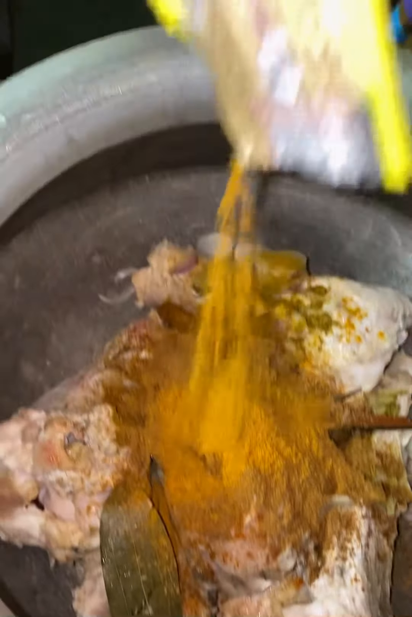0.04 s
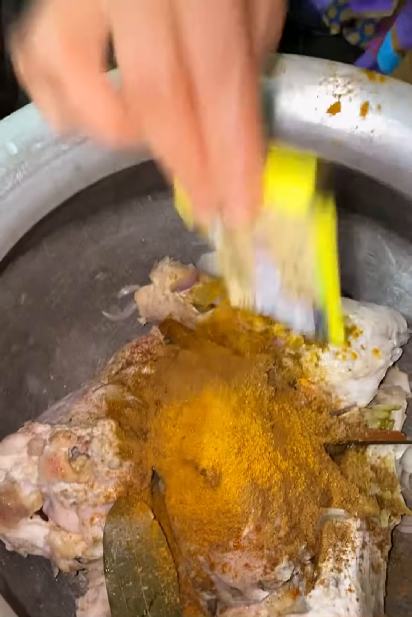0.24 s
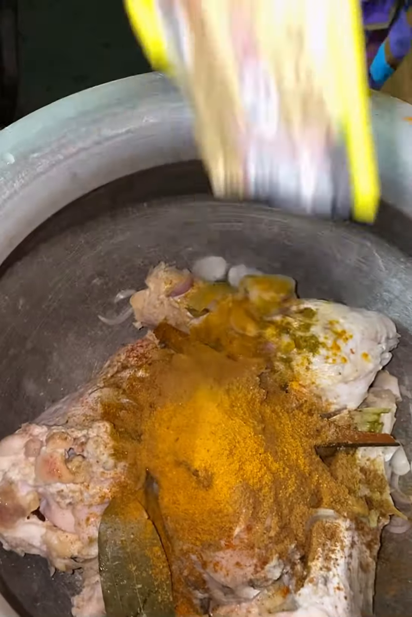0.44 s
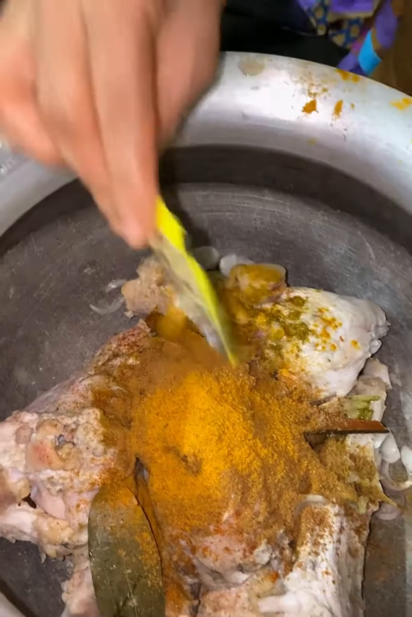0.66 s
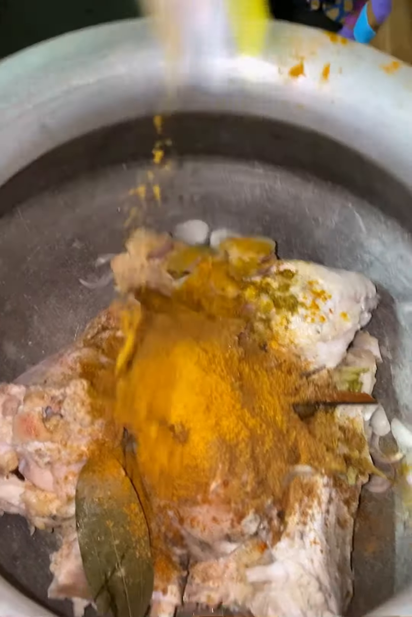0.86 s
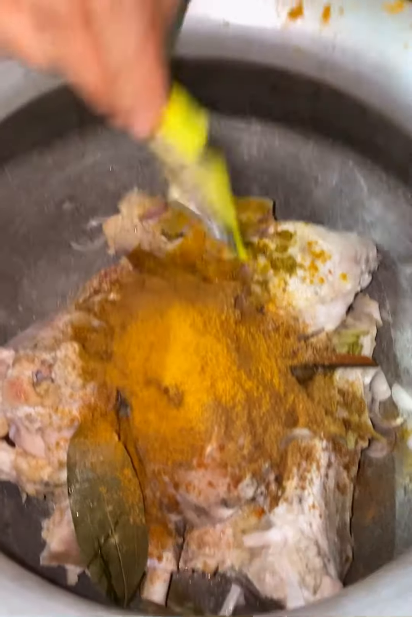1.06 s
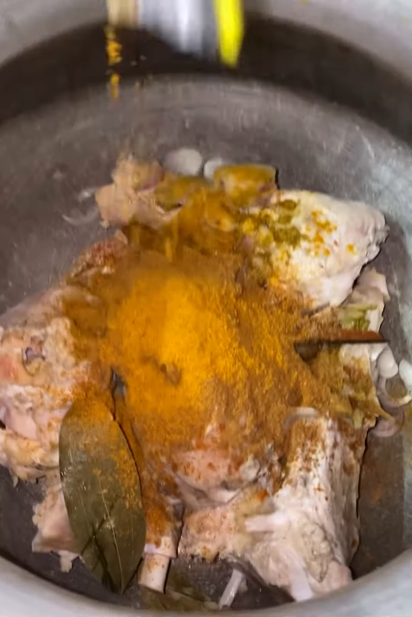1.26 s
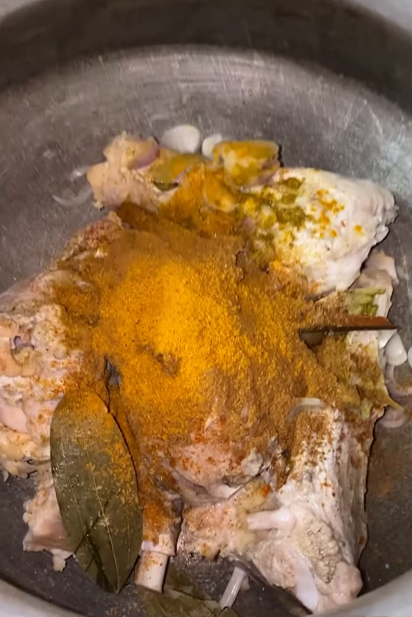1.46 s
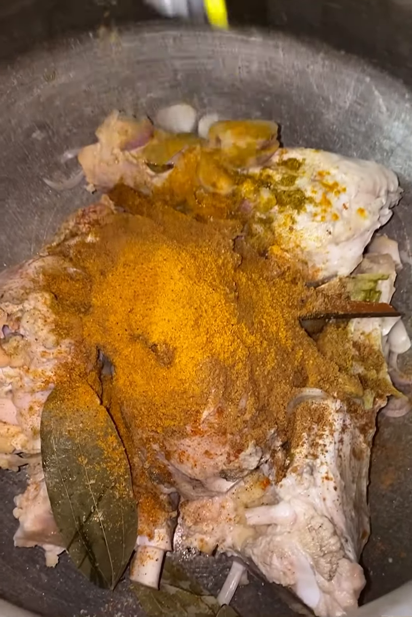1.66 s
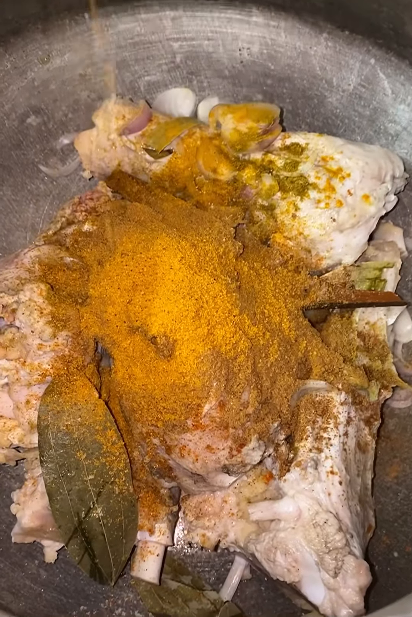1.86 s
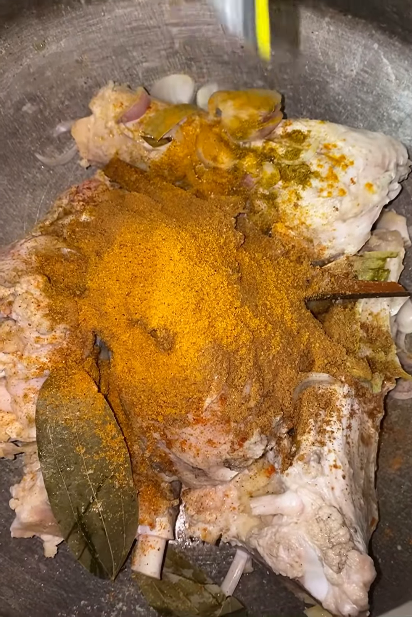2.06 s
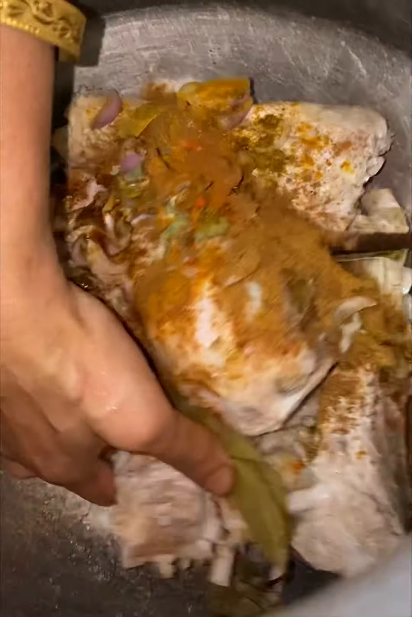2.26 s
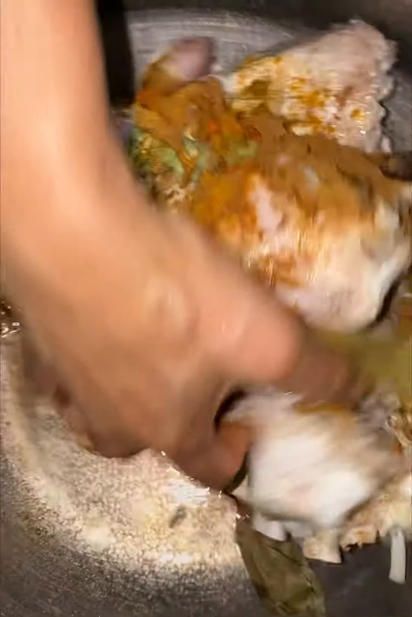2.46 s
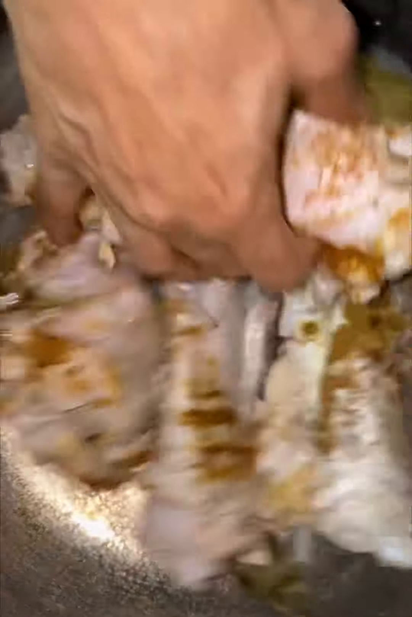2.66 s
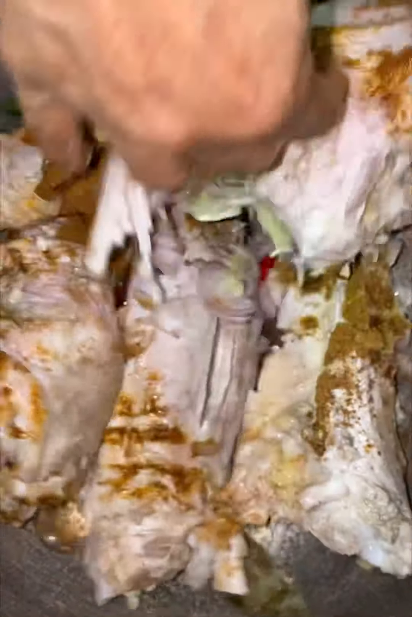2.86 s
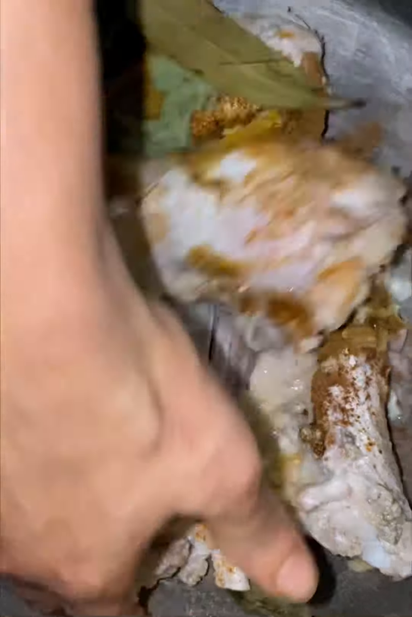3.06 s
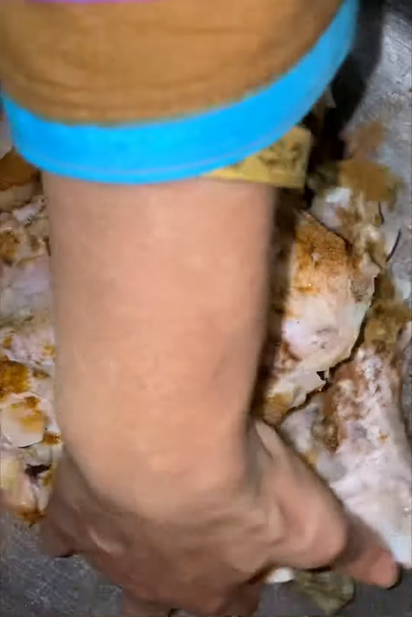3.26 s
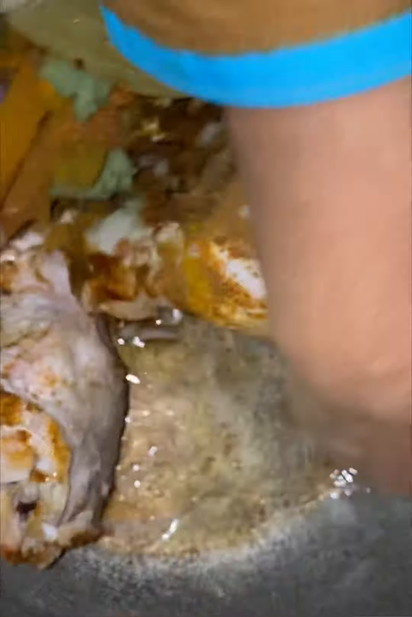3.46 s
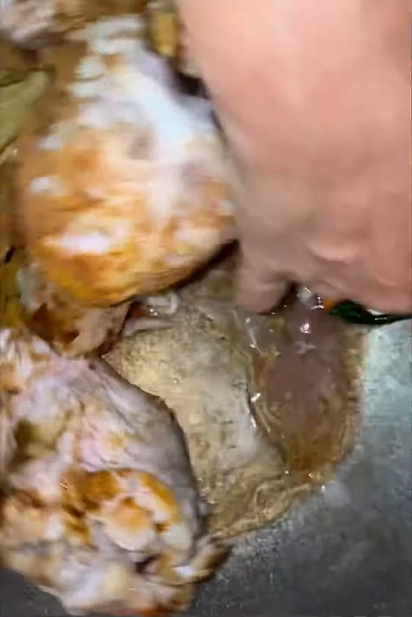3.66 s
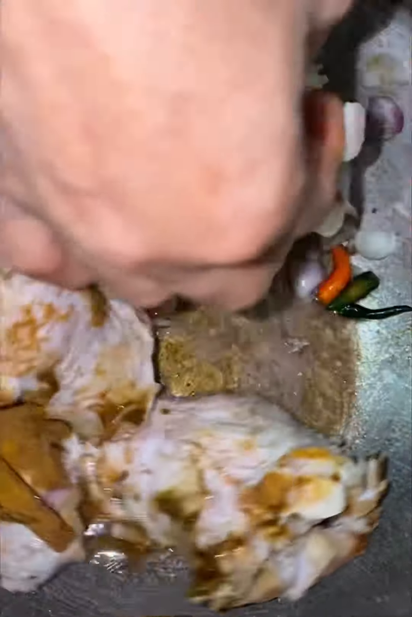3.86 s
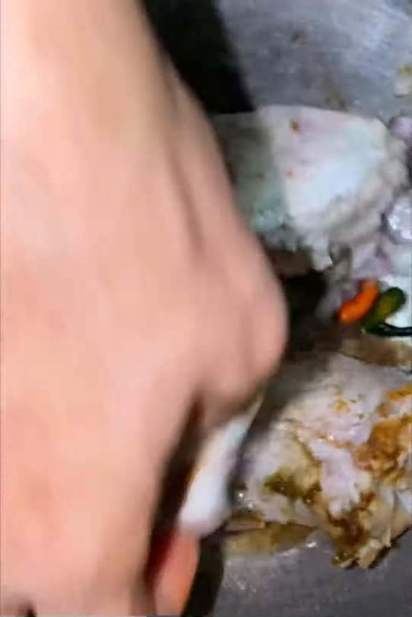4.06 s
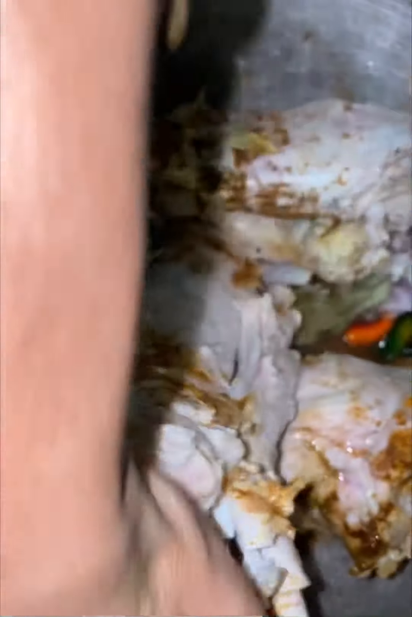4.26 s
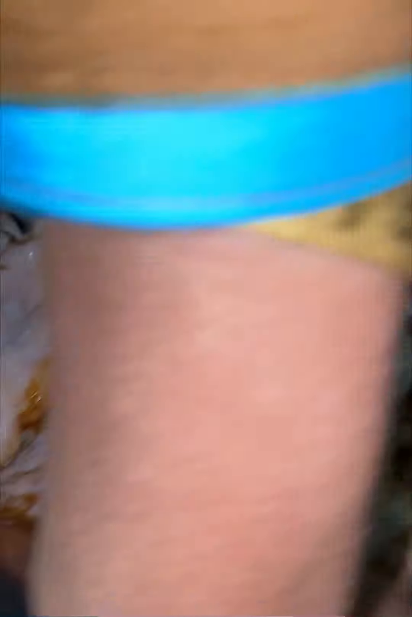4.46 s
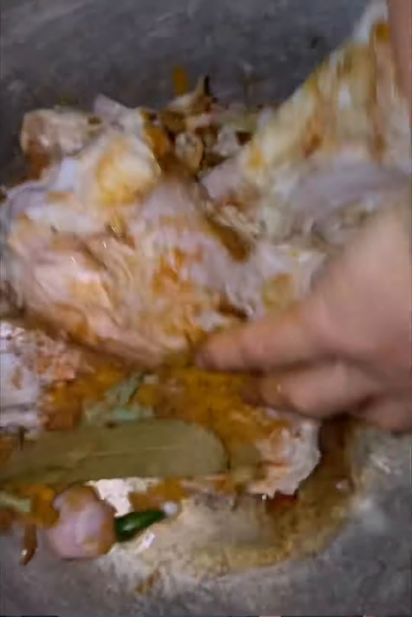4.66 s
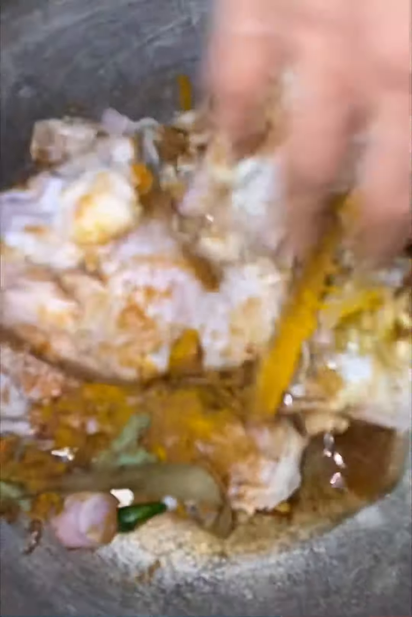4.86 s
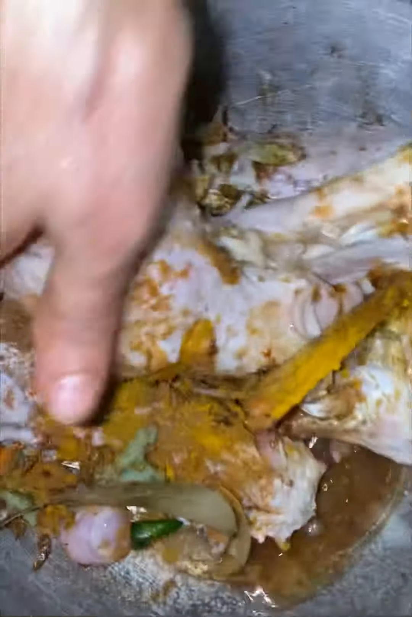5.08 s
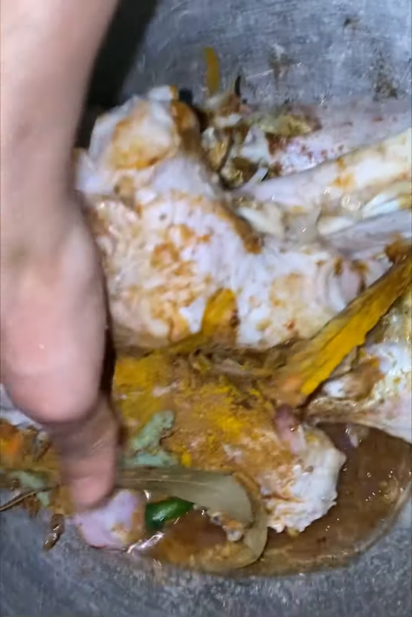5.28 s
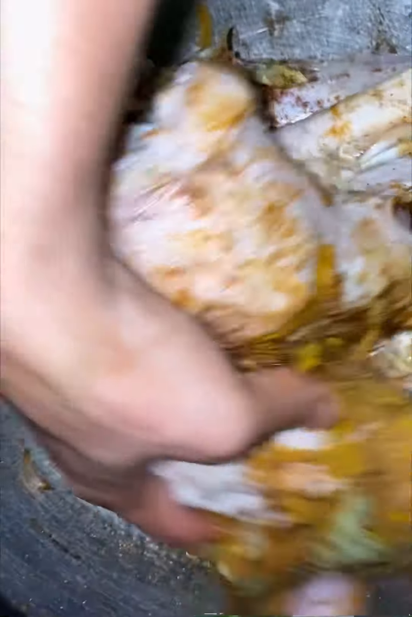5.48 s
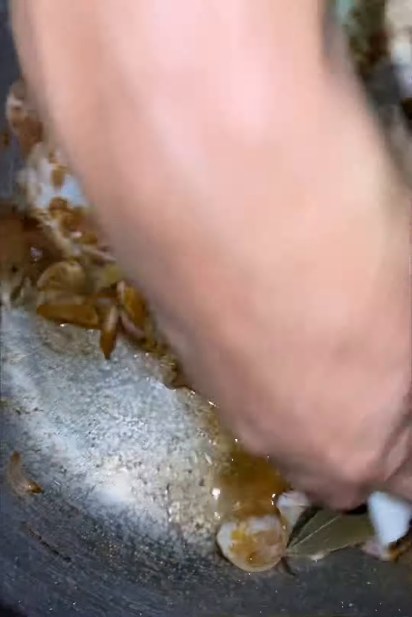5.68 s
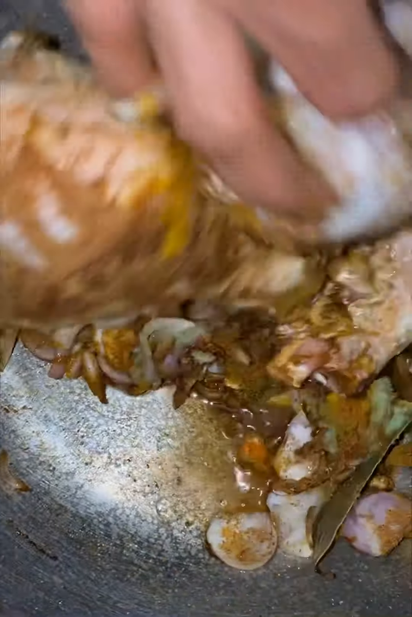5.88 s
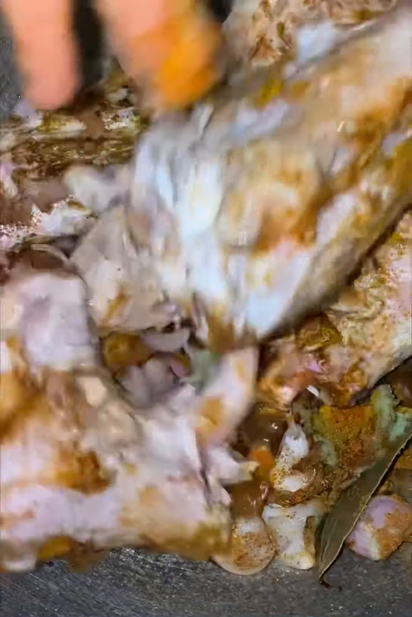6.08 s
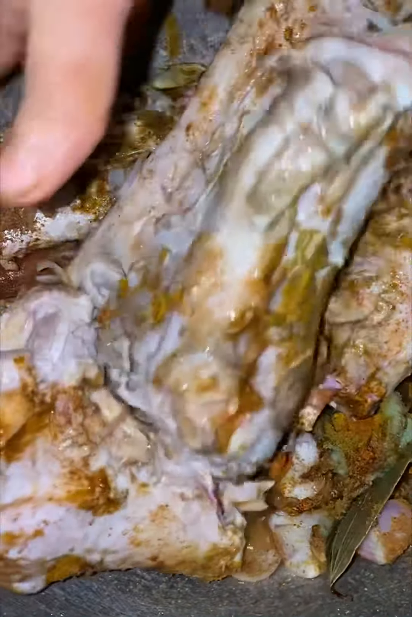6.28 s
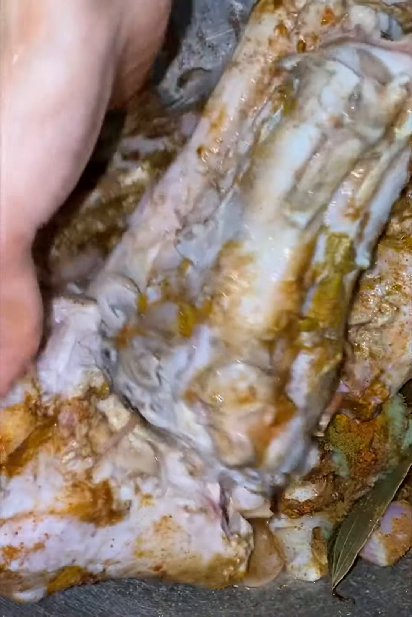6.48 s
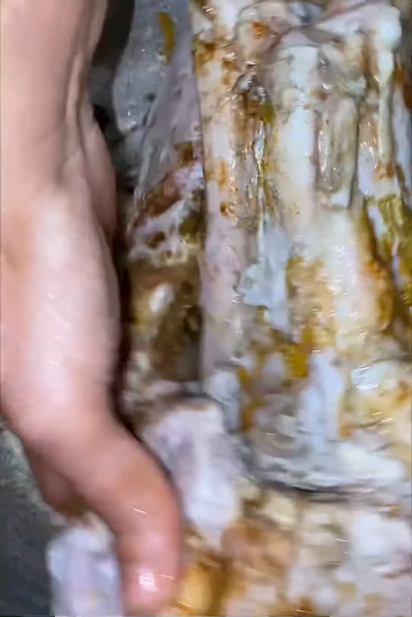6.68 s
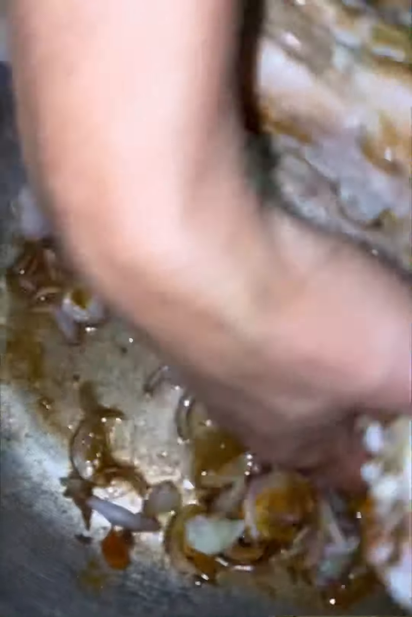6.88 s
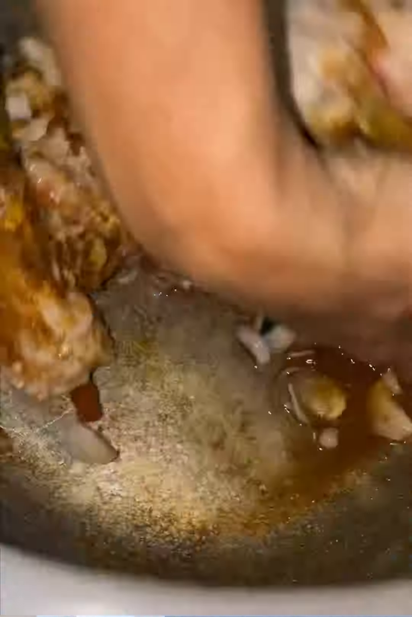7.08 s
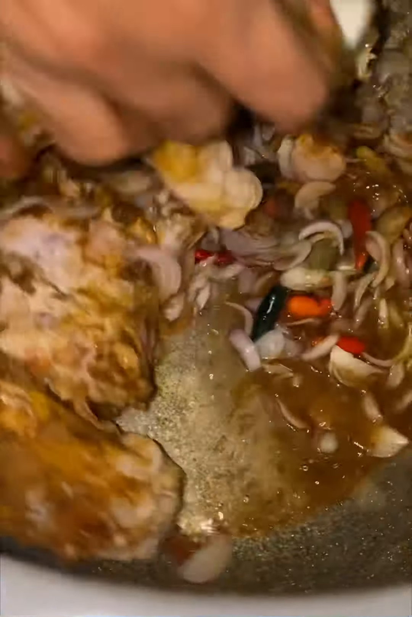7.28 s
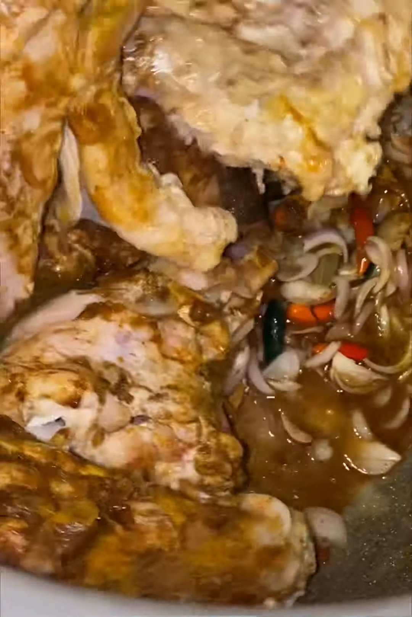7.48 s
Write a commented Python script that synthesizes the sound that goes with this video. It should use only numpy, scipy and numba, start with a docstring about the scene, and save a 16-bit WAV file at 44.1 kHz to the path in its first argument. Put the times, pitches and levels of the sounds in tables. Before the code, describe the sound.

A foil spice packet crackles, then raw meat thuds and squelches in a metal pot as bones knock and scrape, over a low hum.

```python
"""First a foil spice packet crackles as it is shaken over raw meat in a wide metal pot.
Then a hand turns the pieces over: meat thuds and rubs on the bottom, bones knock and drag on the wall,
and each touch makes the metal ring. Gritty marinade scrapes, and air pockets in it squelch and pop.
A kitchen motor hums behind it all, and the loudest blows overload the microphone."""
import sys
import numpy as np
from scipy import signal
from scipy.fft import rfft, irfft
from scipy.io import wavfile
from scipy.ndimage import uniform_filter1d
from numba import njit

SR = 44100
rng = np.random.default_rng(int(sys.argv[2]) if len(sys.argv) > 2 else 0)


def unload_audio(sound):
    """Save the sound as a 16-bit wav file, at the path given as the first command line argument."""
    columns = np.transpose(np.atleast_2d(sound))
    # keep every value between -1 and 1, then stretch to whole-number steps
    steps = np.round(np.clip(columns, -1, 1) * 32767)
    wavfile.write(sys.argv[1], SR, steps.astype(np.int16))


N = 332073
TIME_S = np.arange(N) / SR
HIT_SAMPLES = 8192  # room for one hit to die away
HAND_IN_S = 2.285  # from here on the meat is never quite still


def amp(db):
    """Turns decibels into a gain."""
    return 10 ** (np.asarray(db) / 20)


def unit(x):
    """Scales a sound to an average power of 1."""
    return x / np.sqrt(np.mean(x ** 2))


def curves(spans):
    """Joins the rows into smooth lines over time; the level is silent before and after them."""
    start_s, level_db, *others = np.concatenate(spans).T
    level = np.interp(TIME_S, start_s, level_db, left=-120, right=-120)
    return [level] + [np.interp(TIME_S, start_s, column) for column in others]


def colour(x, points):
    """Makes a noise darker or brighter along (pitch_hz, gain_db) points."""
    hz, db = np.transpose(points)
    log_hz = np.log(np.maximum(np.fft.rfftfreq(N, 1 / SR), 1))
    return irfft(rfft(x) * amp(np.interp(log_hz, np.log(hz), db)), N)


def band(x, low_hz, high_hz, order=2):
    """Keeps the part of a sound between two pitches."""
    edges_hz = [low_hz, min(high_hz, .45 * SR)]
    return signal.sosfilt(signal.butter(order, edges_hz, "bandpass", fs=SR, output="sos"), x)


@njit
def resonate(x, hz, width_hz):
    """Makes a sound ring at a pitch that can move; a smaller width rings longer."""
    out, band_state, low_state = np.empty(len(x)), 0., 0.
    for i in range(len(x)):
        step, damping = np.tan(np.pi * hz[i] / SR), width_hz / hz[i]
        swing = (band_state + step * (x[i] + 1e-18 - low_state)) / (1 + step * (step + damping))
        band_state = 2 * swing - band_state
        low_state += 2 * step * swing
        out[i] = damping * swing
    return out


def wander(rate_hz):
    """Glides between random values, mostly within -1 to 1, rate_hz times a second."""
    hold = int(SR / rate_hz)
    steps = np.repeat(rng.standard_normal(N // hold + 1), hold)
    return 0.83 * uniform_filter1d(steps, hold)[:N]


def grains(per_s, spread_db, tail_s):
    """Tiny random slips, each a sudden puff of noise; a few are much louder than the rest."""
    slips = (rng.random(N) < per_s / SR) * amp(spread_db * rng.exponential(size=N))
    puffs = signal.lfilter([1], [1, -np.exp(-1 / (tail_s * SR))], slips)
    return unit(puffs * rng.standard_normal(N))


def patchy(x, spread_db, rate_hz):
    """Lets each part of the treble swell on its own, as the place of contact moves."""
    centres_hz = 1500 * 1.38 ** np.arange(8)
    return sum((-1) ** k * amp(spread_db * wander(rate_hz)) * resonate(x, np.full(N, hz), hz / 2)
               for k, hz in enumerate(centres_hz))


def snaps(start_s, level_db, pitch_hz, decay_s, spread):
    """Short bursts of noise, each strongest near its pitch; decay_s is the time to fall 60 dB."""
    out, t = np.zeros(N + HIT_SAMPLES), TIME_S[:HIT_SAMPLES]
    for at, gain, hz, decay in np.broadcast(start_s, amp(level_db), pitch_hz, decay_s):
        noise = rng.standard_normal(HIT_SAMPLES)
        burst = unit(band(noise, hz / spread, hz * spread, order=1)) + 0.07 * band(noise, hz / 5, 11000)
        fade = amp(-60 * t / max(decay, .005))
        out[int(at * SR):][:HIT_SAMPLES] += gain * burst * fade / 2
    return out[:N]


def rings(start_s, level_db, pitch_hz, decay_s, rise_s, sag_octaves_per_s):
    """Struck notes that fall 60 dB in decay_s; soft things push more slowly, and the pitch may sag."""
    out, t = np.zeros(N + HIT_SAMPLES), TIME_S[:HIT_SAMPLES]
    push = np.sin(np.pi / 2 * np.minimum(t / rise_s, 1)) ** 2
    slowed_s = np.cumsum(2 ** (-sag_octaves_per_s * t)) / SR
    for at, gain, hz, decay in np.broadcast(start_s, amp(level_db), pitch_hz, decay_s):
        fade = amp(-60 * np.maximum(t - rise_s, 0) / max(decay, .01))
        out[int(at * SR):][:HIT_SAMPLES] += gain * push * fade * np.sin(2 * np.pi * hz * slowed_s)
    return out[:N]


def rub(hz, width_hz, rough=1.0):
    """A note kept going by rubbing; with rough below 1, the steady push evens out its swells."""
    hz = hz * np.ones(N)
    note = resonate(resonate(rng.standard_normal(N), hz, width_hz), hz, width_hz)
    swell = np.sqrt(uniform_filter1d(note ** 2, int(SR / width_hz / 2)) + 1e-12)
    return unit(note / swell ** (1 - rough))


def strokes(rows, bend, rest_db):
    """Level in dB of movements that swell, hold and fade; extra columns lean to the loudest one."""
    t = np.arange(0, N + 16, 16) / SR
    peak_s, level_db, swell_s, hold_s, fade_s, *extras = np.transpose(rows)[:, :, None]
    rising = 1 + (t - peak_s) / swell_s
    falling = 1 - (t - peak_s - hold_s) / fade_s
    power = (amp(level_db) * np.clip(np.minimum(rising, falling), 0, 1) ** bend) ** 2
    creep = amp(2 * rest_db) * (t > HAND_IN_S) + 1e-12  # faint movement between strokes
    total = power.sum(axis=0) + creep
    blends = [((power * column).sum(axis=0) + creep * column.mean()) / total for column in extras]
    return [np.interp(TIME_S, t, line) for line in [10 * np.log10(total)] + blends]


def lifted(landings_s, before_s, after_s, dip_db):
    """Turns the rubbing down around each hard landing: the piece was off the metal just before."""
    dip = np.zeros(N)
    for at in landings_s:
        corners_s = [at - before_s, at - .004, at + after_s / 2, at + after_s]
        dip = np.maximum(dip, np.interp(TIME_S, corners_s, [0, 1, 1, 0]))
    return amp(dip_db * dip)


# The mains hum (first row), then the motor's tones: times_base_pitch, level_db
HUM_TONES = [(2.04, -57.5), (3, -49.5), (4, -60.5), (5, -74), (6, -62), (8, -91.5), (10, -75.5), (19, -95),
             (20, -65.5), (21, -70), (22, -72)]
def motor(base_hz=49.35):
    """A mains hum near 100 Hz sounds with the motor's slightly unsteady tones."""
    angle = 2 * np.pi * np.cumsum(base_hz * (1 + 0.0019 * wander(3.26))) / SR
    return sum(amp(db + wander(11)) * np.sqrt(2) * np.sin(ratio * angle + 2 * np.pi * rng.random())
               for ratio, db in HUM_TONES)


# The tone of the kitchen's background noise: pitch_hz, gain_db
AIR_TONE = [(18, -54), (30, -6), (145, -3), (226, -10.5), (294, -10), (551, -16), (981, -16), (1150, -21.5),
            (2460, -17.5), (3940, -30), (10900, -46), (15800, -42.5)]
def kitchen_air(level_db=-53):
    """A soft, low rush fills the room."""
    return amp(level_db + wander(4.9)) * unit(band(colour(rng.standard_normal(N), AIR_TONE), 58, 18000))


def kitchen_echo(sound, decay_s=0.25, level_db=-16.5):
    """The walls send the sound back as a short, smooth tail."""
    t = TIME_S[:SR // 2]
    tail = rng.standard_normal(len(t)) * amp(-60 * t / decay_s) * (t > .004)
    return amp(level_db) * signal.fftconvolve(sound, tail / np.sqrt(np.sum(tail ** 2)))[:N]


# How loud the rumble under the pot is: time_s, level_db
RUMBLE_LEVELS = [(2.29, -47), (2.36, -47), (2.49, -31), (2.63, -30), (3.0, -40), (3.38, -46), (3.62, -38.5),
                 (3.92, -40), (4.26, -48), (4.6, -50), (4.78, -36), (5.03, -55), (5.53, -37), (6.33, -44.5),
                 (6.6, -42), (6.92, -28.5), (7.21, -34), (7.53, -32)]
def pot_rumble():
    """A low, grainy rumble rises and falls while the meat is turned."""
    level_db, = curves([RUMBLE_LEVELS])
    return amp(level_db) * unit(band(grains(per_s=150, spread_db=.8, tail_s=0.006), 115, 234))


# The hand holding the packet (first row), then each shake: peak_s, level_db, swell_s, hold_s, fade_s
PACKET_SHAKES = [(.002, -53, .002, 1.18, 0.36), (.19, -51, .14, .01, 0.054), (.272, -32.5, .1, 0.0048, .1),
                 (.498, -40.5, 0.19, 0.0035, .12), (.678, -26.5, 0.072, 0.0034, 0.052),
                 (.852, -40, 0.11, 0.0037, 0.019), (.928, -48, 0.081, .004, 0.043),
                 (1.09, -25.5, 0.097, 0.0047, 0.045), (1.535, -25.5, .1, .01, 0.088),
                 (1.64, -46, 0.033, 0.065, 0.23), (1.985, -24.5, 0.086, 0.007, 0.07),
                 (2.162, -43.5, 0.094, .004, 0.061), (2.244, -46, .05, 0.0036, 0.02)]
# The tone of rustling foil: pitch_hz, gain_db
FOIL_TONE = [(1470, -61), (2500, -27.5), (3970, 0.5), (6120, -1), (7770, 1), (9950, 1), (12800, -4),
             (15800, -12)]
# Single creases snapping in the foil: start_s, level_db, pitch_hz
FOIL_CREASES = [(.0631, -18.5, 7000), (.0907, -36, 7930), (.1102, -28, 7700), (.2478, -31, 9310),
                (.266, -22, 8180), (.4444, -23, 11300), (.486, -27, 5290), (0.6212, -18.5, 6540),
                (.6499, -21, 4400), (0.779, -34, 5560), (.842, -28, 5740), (1.024, -21, 6400),
                (1.0827, -14, 8520), (1.2897, -32, 12000), (1.4704, -17, 11400), (1.487, -11.5, 9900),
                (1.5324, -20, 6540), (1.63, -29, 10100), (1.6696, -30.5, 5520), (1.7387, -22.5, 3600),
                (1.95, -17.5, 7330), (1.99, -18, 8000), (2.0677, -28, 10700), (2.157, -26.5, 5700)]
def foil_packet():
    """Each shake sets off a dense, bright crackle over a duller one; single creases stand out."""
    shake_db, = strokes(PACKET_SHAKES, bend=1.83, rest_db=-120)
    crackle = patchy(grains(per_s=1100, spread_db=2.6, tail_s=0.004), spread_db=1.5, rate_hz=40)
    rustle = unit(colour(crackle, FOIL_TONE)) + amp(-18) * unit(band(crackle, 1040, 4200))
    shaking = amp(shake_db + 2.0 * wander(66)) * rustle
    return shaking + snaps(*np.transpose(FOIL_CREASES), decay_s=0.025, spread=1.45)


# Air pockets that pop with a clear note: start_s, level_db, pitch_hz, decay_s
AIR_POPS = [(2.618, -20, 1510, 0.032), (2.634, -27, 1140, .03), (2.871, -25, 1570, .035),
            (2.993, -32, 1390, .04), (5.437, -24, 1200, .04), (5.805, -24, 1360, 0.03)]
def pops():
    """The note of each air pocket falls as the pocket opens."""
    return rings(*np.transpose(AIR_POPS), rise_s=0.0025, sag_octaves_per_s=18.4)


def squelch():
    """Many small air pockets pop between wet pieces; each changes size and so changes pitch."""
    pockets = 0
    for hz in (1830, 2620, 3520, 5100):
        bursts = grains(per_s=45, spread_db=2.1, tail_s=0.0043)
        pockets += resonate(bursts, hz * 2 ** (0.39 * wander(25)), width_hz=330.0)
    return unit(pockets)


# The high notes the pot rings with: pitch_hz, width_hz, gain_db
POT_NOTES = [(1082.6, 27.5, 5), (1170, 11.7, -23), (1385, 42, -32), (1650, 30, 6), (1662, 17, 3),
             (1820, 13, -7), (1993, 8.9, 1), (2232, 185, -10.5), (2338, 70, -9), (2513, 46, -8.5),
             (2906, 45, -8.5), (3220, 44, -2), (3550, 52, -4), (3715, 135, -13), (3880, 52, 1),
             (4100, 90, -27), (4050, 32, -7), (4400, 60, -7), (4250, 20, -5), (4980, 300, -10),
             (5310, 48, -7), (5690, 245, -4), (6170, 50, -4), (6170, 79, -15.5), (6590, 21, 1),
             (7280, 20, -15), (7800, 44, 1)]
def metal(push, wander_db, drift):
    """Rings the pot's high notes; hand and meat muffle and detune now one, now another."""
    out = 0
    for k, (hz, width_hz, db) in enumerate(POT_NOTES):
        gain = (-1) ** k * amp(db + wander_db * wander(9))
        out += gain * resonate(push, hz * (1 + drift * wander(6.3)), float(width_hz))
    return out


# The tone of grinding salt and spice: pitch_hz, gain_db
GRIT_TONE = [(1180, -31), (2000, -8), (2200, 0.5), (2710, 1), (4100, -3), (5650, 4.5), (11600, -0.5),
             (13400, 5), (15800, 6.5)]
# Gritty wet slides: peak_s, level_db, swell_s, hold_s, fade_s, treble_gain_db, ring_over_hiss_db
WET_SLIDES = [(2.31, -28.5, 0.05, 0.033, 1, -7, -4), (2.545, -21.5, 0.12, .005, .12, -1.5, 2),
              (2.63, -28, 0.042, 0.065, 0.081, -3.5, -6), (2.748, -23, 0.049, 0.004, 0.051, -7, -6),
              (2.856, -31, 0.27, 0.0033, .1, -9, -1.5), (2.996, -38.5, 0.023, .005, .15, 2, -6),
              (3.516, -14, 0.44, 0.0078, .04, -6.5, -1.5), (3.6, -15.5, 0.29, 0.017, 0.45, -11, 0.5),
              (3.98, -24.5, 0.025, .005, 0.073, -4, -9), (4.14, -31.5, 0.016, 0.042, .02, -5.5, -11),
              (4.198, -21, .003, .005, 0.13, -7, 6), (4.76, -29.5, 1, 0.032, 0.1, -4.5, -4.5),
              (4.84, -33.5, .01, .01, 0.67, -5, -3), (5.143, -36, 0.11, 0.0045, 0.029, -1.5, 4),
              (5.275, -21.5, 0.022, 0.14, 0.016, -5.5, 0), (5.59, -24.5, 0.6, 0.0033, 0.016, -7, -0.5),
              (5.692, -16.5, 0.27, .005, 0.23, -9.5, -3.5), (5.92, -33, 0.03, 0.011, 0.27, 0, -20),
              (6.065, -25, 0.029, 0.0033, 0.084, -1, -1), (6.244, -34.5, 0.27, 0.0056, 0.032, -5, -9),
              (6.43, -40.5, 0.29, .005, .01, 0, -2.5), (6.438, -21.5, 0.0032, .003, 0.076, -8.5, 6),
              (6.581, -8.5, 0.098, 0.0043, 0.026, -11, 4), (6.6, -24.5, .01, 0.21, 0.035, -5.5, -1),
              (6.913, -18, 0.33, 0.18, 0.0069, -6, -10), (7.14, -20, 0.029, .005, 0.16, -2, -14),
              (7.282, -16, 0.24, 0.0036, 0.16, -6, 2), (7.39, -31, .05, 0.022, .02, 3, -9),
              (7.425, -24.5, 0.0085, 0.0023, 0.032, 12, -12), (7.508, -31, 0.074, 0.0036, 0.025, 5.5, -4)]
SLIDE_BEND, SLIDE_REST_DB = 1.935, -47.5  # curve of swell and fade; creep between slides
def marinade():
    """Salt and spice grind under sliding meat and ring the metal, while the wet pieces squelch."""
    slide_db, treble_db, ring_db = strokes(WET_SLIDES, SLIDE_BEND, SLIDE_REST_DB)
    grit = colour(grains(per_s=1200, spread_db=2.1, tail_s=0.0057), GRIT_TONE)
    hiss = patchy(grit, spread_db=1.5, rate_hz=30)
    ringing = amp(ring_db) * unit(band(metal(grit, wander_db=3.0, drift=0.038), 2020, 6000))
    grinding = (unit(band(hiss, 2900, 6240)) + ringing) / np.sqrt(1 + amp(2 * ring_db))
    body = grinding + 0.23 * squelch()
    treble = amp(treble_db) * unit(band(grit + 1.13 * hiss, 5400, 13030))
    return amp(slide_db + 0.5 * wander(41)) * (body + treble)


# Bare bone on bare metal, one list of points for each scrape: time_s, level_db, pitch_hz
BONE_SCRAPES = [
    [(3.526, -11, 1390), (3.556, -26, 1440), (3.59, -20, 2680), (3.61, -17, 2700), (3.654, -31, 2180),
     (3.78, -24, 2770)],
    [(4.197, -31, 3140), (4.227, -24, 3100), (4.265, -34, 3040), (4.271, -30, 3090), (4.3, -40, 3290)],
    [(5.271, -5, 3160), (5.315, -32, 2980), (5.339, -15.5, 2420), (5.411, -22, 1970), (5.45, -38, 1680)],
    [(6.436, -6, 1870), (6.504, -48, 1790), (6.524, -24, 1780), (6.586, -6, 2660), (6.6, -23, 2590),
     (6.69, -30.5, 3600)],
    [(6.827, -26, 1130), (6.853, -25, 1090), (6.949, -25, 1090), (6.979, -22, 1150), (7.039, -27, 2470),
     (7.104, -16, 3200)],
    [(7.263, -20, 2100), (7.36, -41, 2520)],
    [(7.424, -34, 1770), (7.43, -23.5, 1770), (7.462, -30, 1710), (7.49, -34, 1680)],
]
def bone_scrapes():
    """Hard bone keeps the pot's high notes singing, most of all those near the scrape's pitch."""
    gain = sum(amp(curves([scrape])[0]) for scrape in BONE_SCRAPES)
    _, pitch_hz = curves(BONE_SCRAPES)
    rasp = resonate(grains(per_s=900, spread_db=0.82, tail_s=0.012), pitch_hz, width_hz=870.0)
    return gain * unit(metal(rasp, wander_db=6.5, drift=.003))


# Wall notes next to the main one: pitch_hz, width_hz, gain_db
WALL_SIDE_NOTES = [(645, 48, -9.5), (748, 38, -6.5), (862, 180, -16)]
# Bones dragged on the wall: peak_s, level_db, swell_s, hold_s, fade_s, pitch_hz, skip_gain_db
BONE_DRAGS = [(2.31, -39, 0.045, 0.15, .05, 723, -3), (2.552, -28.5, 0.25, 0.0027, 0.028, 720, 3),
              (2.87, -46, 0.13, .003, 0.041, 715, 17.5), (3.0, -43.5, 0.028, .003, 0.045, 760, 11),
              (3.4, -45.5, 0.96, .01, .05, 704, 10), (3.45, -31, 0.17, .003, 0.037, 753, -17),
              (3.527, -10.5, 0.007, 0.015, 0.049, 715, -14), (3.613, -16, 0.2, .003, 0.25, 699, -7.5),
              (3.75, -35, .05, 0.042, 0.7, 698, -7), (3.975, -20.5, 0.038, 0.0085, .06, 668, -3.5),
              (4.195, -53, 0.19, .003, 0.084, 635, 18), (4.637, -43, 0.62, .003, .35, 657, 13.5),
              (4.953, -35, 0.074, .003, .08, 652, -9), (5.272, -22, 0.013, 0.15, 0.088, 650, -13.5),
              (5.03, -58.5, 0.032, 0.033, 0.13, 700, 24), (5.47, -39, 0.033, .01, .04, 640, 12),
              (5.528, -36.5, 0.072, .003, 0.1, 670, 12.5), (5.606, -11, 0.0096, .002, .025, 700, -17),
              (5.625, -21, .005, .003, 0.12, 708, -13), (5.718, -32.5, 0.096, .003, 0.36, 687, 0),
              (6.086, -36.5, 0.17, .003, 0.06, 753, 3.5), (6.254, -51, 0.12, .003, 0.076, 690, 12),
              (6.42, -45.5, 0.22, 0.011, .01, 750, 1), (6.45, -20.5, 0.033, .003, 0.08, 743, -4),
              (6.579, -20.5, 0.16, .003, .15, 660, 3.5), (6.66, -31, 0.046, 0.079, .15, 690, -5.5),
              (6.828, -8, 0.0046, .003, 0.042, 714, -9), (6.96, -10, 0.3, .003, 0.036, 732, -12.5),
              (6.98, -17.5, .02, 0.072, 0.063, 712, -8), (7.23, -39, 0.27, .01, 0.022, 750, -3),
              (7.262, -25.5, 0.026, .003, 0.19, 748, -18), (7.427, -18, .007, .003, 0.11, 692, -10)]
def bone_drags(slide_skip_db=-19):
    """Dragged bones rub the wall into a note; in drags and wet slides they also skip on the metal."""
    drag_db, wall_hz, skip_db = strokes(BONE_DRAGS, bend=3.08, rest_db=-62.5)
    slide_db = strokes(WET_SLIDES, SLIDE_BEND, SLIDE_REST_DB)[0]
    wall = rub(wall_hz, width_hz=45., rough=0.97)
    wall += sum(amp(db) * rub(hz, float(width_hz)) for hz, width_hz, db in WALL_SIDE_NOTES)
    chatter = grains(per_s=400, spread_db=0.95, tail_s=0.0067)
    ringing = unit(band(metal(chatter, wander_db=10.5, drift=0.013), 680, 2400))
    skips = unit(band(ringing + 1.7 * unit(band(chatter, 1100, 1750)), 900, 2930))
    skip_gain = np.hypot(amp(drag_db + skip_db), amp(slide_db + slide_skip_db))
    contact = lifted(landings(above_db=-2.2), before_s=0.043, after_s=0.012, dip_db=-5.0)
    return contact * (amp(drag_db) * wall + skip_gain * skips)


# Bone knocks and wet smacks: start_s, level_db, pitch_hz, decay_s, ring_push_db
KNOCKS_AND_SMACKS = [(2.5365, -7, 1680, 0.044, 4), (2.619, -19, 1360, 0.035, -15.5),
                     (2.7368, -23.5, 5330, 0.15, 14), (2.815, -20.5, 5470, 0.05, -19),
                     (2.846, -14, 4170, 0.052, 13.5), (2.987, -25, 9300, 0.062, 4),
                     (3.0826, -24, 3740, 0.19, -16), (3.1226, -23, 8020, 0.041, -5),
                     (3.1586, -21, 5400, 0.06, -3), (3.235, -24, 5300, 0.092, -1),
                     (3.525, 3, 2300, 0.022, -2), (3.9745, -1.5, 2750, 0.034, -8),
                     (4.0577, -25, 5700, 0.099, -10), (4.132, -24.5, 6470, 0.063, -6.5),
                     (4.1962, -5.5, 5800, 0.069, -6), (4.27, -15, 5540, 0.062, 4),
                     (4.375, -23, 5500, 0.033, -8), (4.4682, -21, 6200, 0.073, -6),
                     (4.6044, -21, 5200, 0.047, 10), (4.651, -11.5, 6450, 0.029, -3),
                     (4.7156, -10.5, 3330, 0.033, -15), (4.7736, -15, 4230, 0.077, -4),
                     (4.8154, -12.5, 5300, 0.09, -0.5), (4.8405, -23, 8840, 0.033, -3),
                     (5.055, -12.5, 5000, 0.021, -8), (5.1868, -10.5, 4600, 0.062, 7.5),
                     (5.249, -21.5, 1690, 0.038, -4), (5.272, -3, 3720, 0.036, 6),
                     (5.2793, -8, 2160, 0.053, 15), (5.5114, -13.5, 3040, 0.09, 12),
                     (5.5985, -6.5, 1760, 0.033, -9), (5.862, -16, 3130, 0.1, -7),
                     (5.911, -12, 2690, 0.036, -11.5), (6.0615, -16, 3570, 0.045, -3),
                     (6.175, -19, 3480, 0.054, 10), (6.2358, -26, 1670, 0.054, 8),
                     (6.378, -21, 6600, 0.067, 1), (6.4362, -4.5, 1730, 0.065, 0),
                     (6.526, -8.5, 2000, 0.042, 0), (6.6345, -17, 3730, 0.094, 16),
                     (6.8055, -5, 3480, 0.063, -14), (6.8267, -8.5, 1500, 0.054, -5),
                     (7.1226, -17.5, 5180, 0.083, 4), (7.2617, -5, 2150, 0.046, 9),
                     (7.424, -6, 1990, 0.025, -13), (7.4979, -28, 1680, 0.044, 9)]
def knocks():
    """Each contact cracks, and a shorter burst at the same moment sets the metal ringing."""
    start_s, level_db, pitch_hz, decay_s, ring_push_db = np.transpose(KNOCKS_AND_SMACKS)
    cracks = snaps(start_s, level_db, pitch_hz, decay_s, spread=1.31)
    push = snaps(start_s, level_db + ring_push_db, pitch_hz, 0.23 * decay_s, spread=1.01)
    return cracks + 4.2 * metal(push, wander_db=2.0, drift=0.0064)


# Bones striking the wall: start_s, level_db, pitch_hz, decay_s
BONE_CLANKS = [(3.444, -21, 795, .064), (3.526, 0.5, 736, 0.1), (3.973, -15, 750, 0.052),
               (5.275, -22, 680, 0.082), (5.599, 1.5, 700, 0.066), (6.442, -19, 724, 0.11),
               (6.586, -15.5, 651, 0.23), (6.805, -12, 750, 0.05), (6.827, 5.5, 776, 0.0086),
               (6.904, -2, 790, 0.032), (6.916, -3, 742, .052), (6.934, -1.5, 727, 0.084),
               (6.947, -5, 697, 0.18), (7.097, -9.5, 556, 0.014), (7.265, -13.5, 736, 0.087),
               (7.429, -0.5, 660, 0.027)]
def bone_clanks():
    """Hard bone starts the wall's note quickly, and the pitch holds steady."""
    return rings(*np.transpose(BONE_CLANKS), rise_s=0.0014, sag_octaves_per_s=0)


# Meat shoved over the bottom: peak_s, level_db, swell_s, hold_s, fade_s, pitch_hz
MEAT_SHOVES = [(2.3, -26, 0.038, 0.22, .05, 331), (2.6, -30, .03, 0.073, 0.033, 293),
               (3.02, -23.5, 0.057, .005, 0.041, 307), (3.165, -24.5, .015, 0.0035, 0.028, 292),
               (3.19, -34, 0.094, 0.051, .05, 290), (3.304, -21, 0.096, 0.16, 0.078, 320),
               (3.534, -13.5, 0.035, .005, 0.35, 283), (3.68, -7, .03, .005, 0.21, 287),
               (3.95, -18.5, 0.29, 0.013, 0.029, 257), (4.0, -18, 0.023, .03, 0.064, 280),
               (4.08, -30.5, .03, 0.17, 0.042, 290), (4.27, -41, .03, 0.11, 0.076, 285),
               (4.612, -31.5, 0.2, 0.0087, 0.018, 300), (4.819, -29.5, .035, .005, 0.14, 280),
               (4.943, -13, 0.062, 0.018, 0.048, 300), (5.283, -22, 0.07, .005, 0.3, 263),
               (5.541, -30, 0.12, 0.0042, 0.022, 297), (5.794, -17, 0.45, 0.0032, 0.089, 310),
               (6.224, -32, 0.081, .005, 0.069, 285), (6.552, -20.5, 0.099, .005, 0.29, 270.4),
               (6.88, -25.5, .03, 0.1, .05, 290), (7.0, -16.5, .1, 0.078, 0.022, 284),
               (7.27, -26, 0.43, 0.053, 0.33, 303), (7.5, -28, 0.025, .03, .02, 250)]
def meat_shoves(bottom_hz=292):
    """Sliding meat rubs the bottom into a low note, and its weight bends the pitch."""
    # each dropped piece skids on a little, like a small extra shove
    skids = [(at, db - 18, .02, .005, 0.13, bottom_hz + 0.33 * (hz - bottom_hz))
             for at, db, hz, _, _ in MEAT_DROPS]
    shove_db, pitch_hz = strokes(MEAT_SHOVES + skids, bend=2.66, rest_db=-48)
    overtone = amp(-23) * rub(hz=494, width_hz=245., rough=0.83)
    contact = lifted(landings(above_db=-7.5), before_s=0.038, after_s=0.0235, dip_db=-4.0)
    return amp(shove_db) * (rub(pitch_hz, width_hz=60.5) + overtone) * contact


def landings(above_db):
    """The times when meat lands harder than a given level."""
    return [at for at, level_db, *_ in MEAT_DROPS if level_db > above_db]


# Meat dropping on the bottom: start_s, level_db, pitch_hz, decay_s, jolt_gain_db
MEAT_DROPS = [(2.295, -20, 343.6, .07, -31), (2.322, -16.5, 347, 0.093, -36), (2.352, -17, 320, 0.23, -36),
              (2.434, -2, 316, 0.1, -41), (2.47, -4.5, 285, 0.059, -36), (2.554, 2.5, 295.5, 0.057, -24),
              (2.667, -13, 273, 0.072, -20), (2.741, -16.5, 145, 0.033, -18),
              (2.876, -2.5, 263, 0.045, -20.5), (3.003, -22.5, 365, 0.085, -5),
              (3.307, -14.5, 307, .07, -45), (3.36, -13, 315.5, 0.16, -49), (3.393, -11, 293, 0.14, -38),
              (3.44, 2.5, 278.6, 0.1, -41), (3.529, 0.5, 279, 0.035, -17), (3.678, -11, 265, 0.053, -46),
              (3.92, -11, 244, 0.069, -37), (3.974, 8, 294.4, 0.078, -24.5), (4.211, -13.5, 284, .074, -32),
              (4.602, -17, 295, 0.045, -26), (4.637, -0.5, 223, 0.037, -48), (4.717, -17, 303, 0.075, -22),
              (4.929, -21, 280, 0.13, -41), (4.945, -5.5, 306, 0.15, -49), (4.972, -8.5, 316, 0.084, -39),
              (5.249, -23, 295, .06, -30), (5.604, 5, 289, 0.072, -28), (5.921, -7, 230, 0.027, -15.5),
              (6.067, -4.5, 278, 0.028, -10.5), (6.351, -18.5, 295, 0.056, -12),
              (6.377, -23, 301, 0.055, -25), (6.44, -9.5, 275, 0.034, -39), (6.829, 3, 295, 0.047, -27),
              (6.994, -5, 265, .07, -31), (7.097, -8, 327, 0.012, -7.5), (7.262, -0.5, 312, 0.028, -16),
              (7.432, -4, 202.2, 0.075, -21)]
def meat_thuds(jolt_hz=71, rise_s=0.0059, sag_octaves_per_s=1.3):
    """Soft meat rings the bottom, the pitch sags as it settles, and the pot jolts on its stand."""
    start_s, level_db, pitch_hz, decay_s, jolt_db = np.transpose(MEAT_DROPS)
    bottom = rings(start_s, level_db, pitch_hz, decay_s, rise_s, sag_octaves_per_s)
    jolts = rings(start_s, level_db + jolt_db, jolt_hz, 1.1 * decay_s, rise_s, sag_octaves_per_s)
    return bottom + jolts


def scene():
    """Adds the packet and everything in the pot to the sound of the kitchen, in one channel."""
    cooking = foil_packet() + meat_shoves() + pot_rumble() + meat_thuds()
    cooking += bone_drags() + bone_clanks() + bone_scrapes()
    cooking += marinade() + knocks() + pops()
    return (cooking + kitchen_echo(cooking) + motor() + kitchen_air())[None]


def record(dry):
    """The microphone drops the deep bass, flattens the loudest peaks and cuts the highest treble."""
    bass_cut = signal.butter(2, 42, "highpass", fs=SR, output="sos")
    treble_cut = signal.ellip(8, .2, 70, 15750, fs=SR, output="sos")
    overloaded = np.clip(signal.sosfilt(bass_cut, dry), -1.02, 1.02)
    return np.clip(signal.sosfilt(treble_cut, overloaded), -1, 1)


dry = scene()
out = record(dry)
unload_audio(out)
```